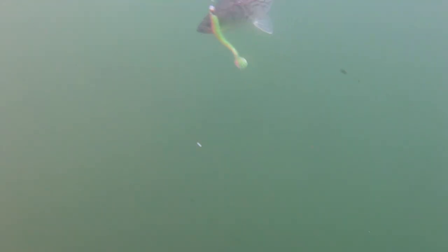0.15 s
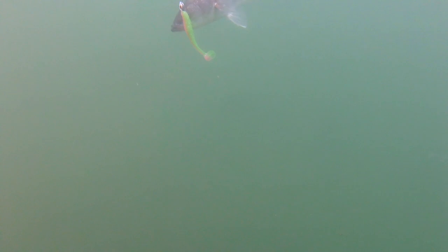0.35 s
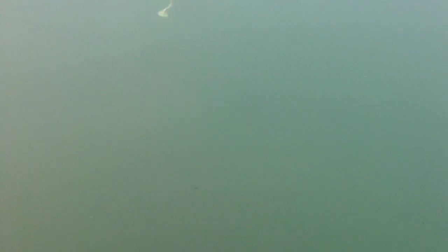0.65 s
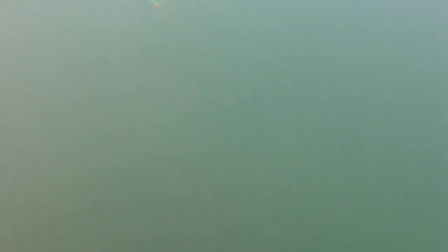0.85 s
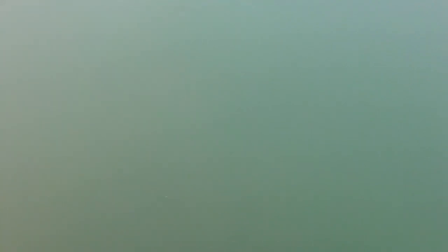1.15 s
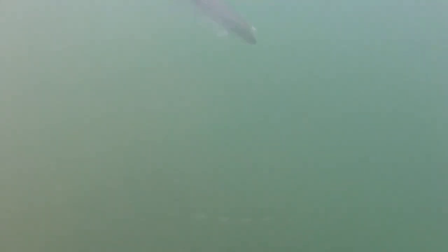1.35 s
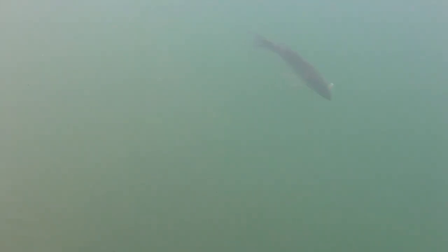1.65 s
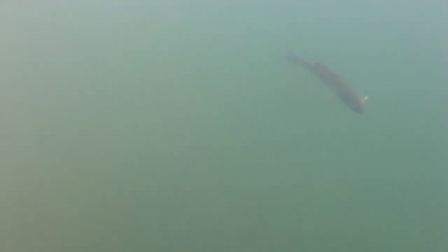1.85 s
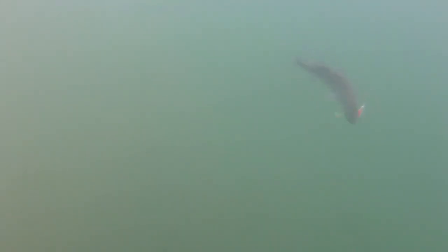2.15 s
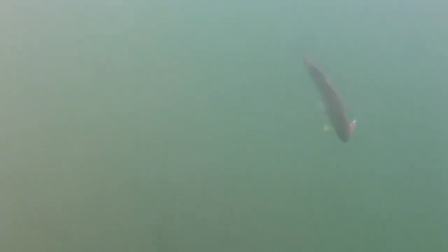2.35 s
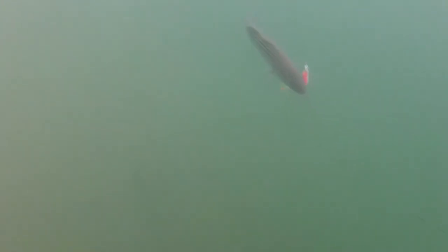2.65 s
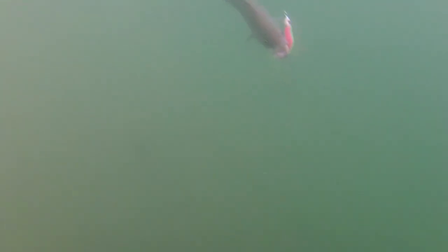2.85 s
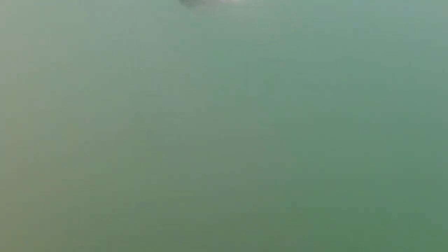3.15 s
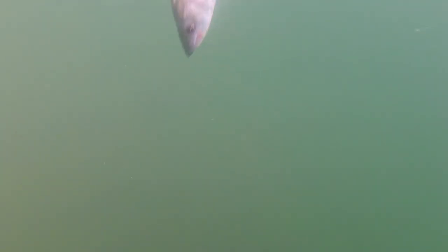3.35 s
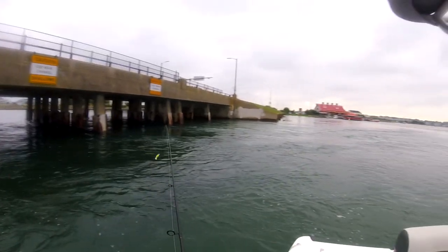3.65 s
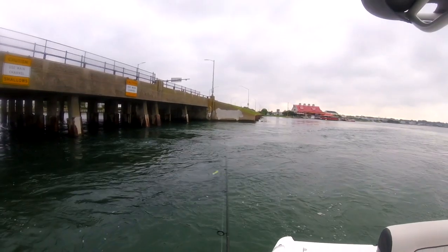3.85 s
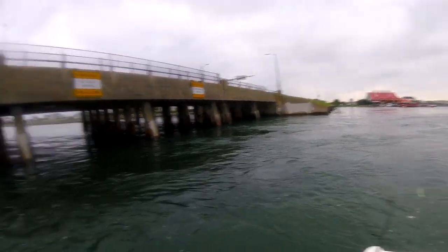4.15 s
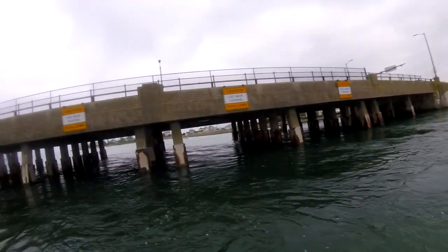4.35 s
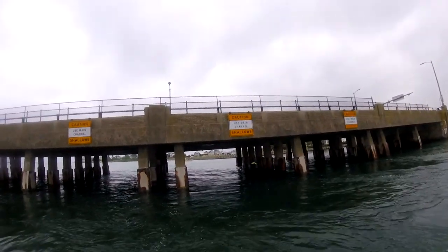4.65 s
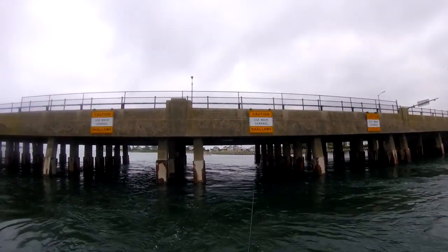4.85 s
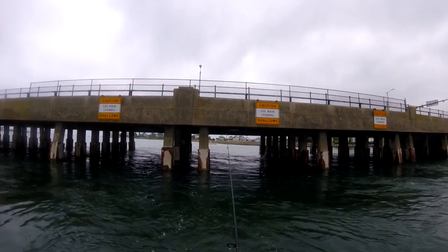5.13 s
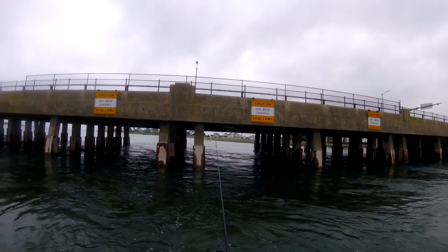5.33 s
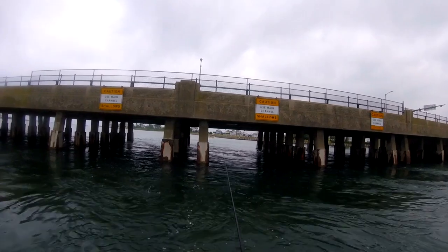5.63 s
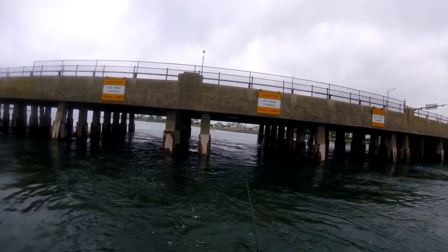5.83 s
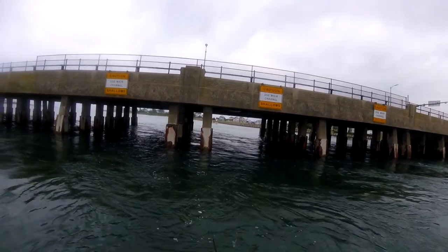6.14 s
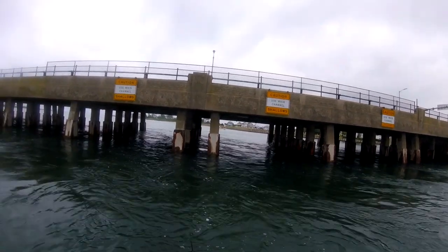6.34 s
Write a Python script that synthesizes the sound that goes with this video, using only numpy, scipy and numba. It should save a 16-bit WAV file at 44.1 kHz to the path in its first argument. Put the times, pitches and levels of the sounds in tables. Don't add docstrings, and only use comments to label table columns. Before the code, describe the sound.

From 0 to 2.55 seconds a sealed microphone underwater hears an idling outboard motor: a steady, fast low throb of about 43 pulses per second, hunting slightly, with a rough hollow hull ring and loose metallic clatter. Bright knocking grows strongest around 1.7 seconds, while low water rumble buffets the housing, heavier after 0.85. Tiny pings tick near 2.1 and 2.4. At 2.55 a thump cuts to a calmer, softer motor passage, with low watery pushes around 2.6 and 3.05 and a brighter ping near 3.2. At 3.48 the sound switches quickly to open air: gusty wind rumbles on the microphone, strongest until about 4.0 and again near 5.6. Water laps hollowly, fine spray hisses, and small splashes slap around 3.6, 4.25, 4.65, 5.4 and 5.8. Distant machinery hums faintly underneath until the wind drops just before the end, near 6.5. A faint gritty, very high buzz colours everything.

```python
import sys
import numpy as np
from scipy import signal
from scipy.fft import rfft, irfft
from scipy.io import wavfile
from scipy.ndimage import uniform_filter1d
from numba import njit

SR = 44100
rng = np.random.default_rng(int(sys.argv[2]) if len(sys.argv) > 2 else 0)


def makeup_ratio(level_db):
    decades = np.asarray(level_db, float) / 20
    return 10 ** decades


def int16_out(signal):
    q = np.round(np.clip(np.atleast_2d(signal).T, -1, 1) * 32767)
    wavfile.write(sys.argv[1], SR, q.astype(np.int16))


N = 286209
T = np.arange(N) / SR
CUT_S, SURFACE_S = 2.554, 3.484
# time_s, level_db
FLOW = [
    [(0.0, -20), (0.2, -23.5), (0.51, -18), (0.68, -23.5), (0.85, -15), (1.02, -18), (1.7, -20),
     (1.9, -16.5), (2.554, -15.5)],
    [(2.554, -25.5), (2.75, -26), (3.02, -21.5), (3.18, -23.5), (3.484, -24)],
]


def unit(x):
    return x / np.sqrt(np.mean(x ** 2))


def curves(*tables):
    s, *columns = np.transpose(np.vstack(tables))
    return [np.interp(T, s, column) for column in columns]


def fade(start, end, slope):
    return np.clip(np.minimum(T - start, end - T) / slope, 0, 1)


def walk(rate):
    hold = int(SR / rate)
    levels = np.repeat(rng.standard_normal(N // hold + 1), hold)
    return 0.6 * uniform_filter1d(uniform_filter1d(levels, hold), hold)[:N]


def tone(hz, wander_hz):
    phase = 2 * np.pi * np.cumsum(hz + wander_hz * walk(14)) / SR
    return np.sqrt(2) * makeup_ratio(6 * walk(9)) * np.sin(phase)


@njit
def svf(x, hz, width):
    y, b, l = np.empty(len(x)), 0., 0.
    g, k = np.tan(np.pi * hz / SR), width / hz
    for i in range(len(x)):
        v = (b + g * (x[i] - l)) / (1 + g * (g + k))
        b, l, y[i] = 2 * v - b, l + 2 * g * v, k * v
    return y


def ring(x, modes, steep=False):
    out = 0
    for k, (hz, width, db) in enumerate(modes):
        band = svf(x, 1. * hz, 1. * width)
        if steep:
            band = svf(band, 1. * hz, 2. * width)
        out = out + (-1) ** k * makeup_ratio(db) * unit(band)
    return unit(out)


def coloured(points, flicker_db, rate):
    hz = np.maximum(np.arange(N // 2 + 1) * SR / N, 1)
    at, db = np.transpose(points)
    spectrum = rfft(rng.standard_normal(N)) * makeup_ratio(np.interp(np.log(hz), np.log(at), db))
    octave = np.log2(hz / 20)
    out = 0
    for k in range(-1, 11):
        band = irfft(spectrum * np.clip(1 - abs(octave - k), 0, 1), N)
        out = out + band * makeup_ratio(flicker_db * walk(rate))
    return unit(out)


def motor():
    # time_s, lead_turns (ahead of a steady idle), load_db
    idle = [
        [(0.0, -0.11, -29.5), (0.2, -0.29, -29.5), (0.36, -0.25, -26.5), (0.72, 0.07, -24), (0.88, 0.2, -24),
         (1.02, 0.073, -25), (1.22, 0.38, -23.5), (1.36, 0.55, -26), (1.53, 0.53, -29), (1.87, 0.78, -31),
         (2.04, 0.56, -29.5), (2.3, 0.58, -25), (2.554, 0.509, -27.5)],
        [(2.554, 0.35, -29), (2.72, 0.49, -33), (3.02, 0.32, -30), (3.2, 0.073, -30.5), (3.484, -0.098, -29.5)],
    ]
    lead, load_db = curves(*idle)
    turns = 43 * T + lead + .17
    fired = np.flatnonzero(np.diff(np.floor(turns)) > 0)
    return hum(turns, load_db) + hull(fired, load_db) + clatter(fired, load_db) + knock(fired)


def hum(turns, load_db):
    orders_db = (-8.5, -8, 0)
    out = 0
    for order, db in enumerate(orders_db, start=1):
        level_db = load_db + db + sway_db(order) - 0.5 + 0.89 * walk(15)
        out = out + np.sqrt(2) * makeup_ratio(level_db) * np.sin(2 * np.pi * order * turns + .1)
    heave_db = curves(*FLOW)[0] - 8.0
    return out + makeup_ratio(heave_db) * np.sin(np.pi * turns)


def sway_db(order):
    # time_s, order, gain_db, length_s
    swings = [(0.0, 1, 16.5, 0.097), (0.535, 1, 13, 0.2), (0.853, 1, 4, .2), (1.302, 1, 15, .35),
              (1.751, 1, 16.5, .3), (2.2, 1, 7, .2), (2.582, 1, 13.5, 0.5), (0.17, 2, 14, 0.18),
              (0.653, 2, 10, 0.28), (1.218, 2, 6.5, .25), (1.952, 2, 12.5, 0.26), (2.42, 2, 8, 0.18),
              (2.8, 2, 8.5, 0.29), (3.329, 2, 10, 0.18), (1.999, 3, 6, 0.17), (2.552, 3, 6.5, .2)]
    return sum(db * np.exp(-2 * ((T - s) / length) ** 2) for s, k, db, length in swings if round(k) == order)


def blows(fired, scatter_db, scatter_s, rattle_s, rattle, floor):
    uneven_db = 2.0 * (-1) ** np.arange(len(fired))
    chance = np.clip(rng.standard_normal((N // 500, 2))[:len(fired)], -2, 2)
    at = np.clip(fired + (chance[:, 1] * scatter_s * SR).astype(int), 0, N - 1)
    tap = np.zeros(N)
    tap[at] = makeup_ratio(uneven_db + scatter_db * chance[:, 0])
    puff = signal.lfilter([1], [1, -np.exp(-1 / (rattle_s * SR))], tap) * rng.standard_normal(N)
    return unit(tap) + rattle * unit(puff) + floor * rng.standard_normal(N)


def hull(fired, load_db):
    # pitch_hz, width_hz, level_db
    hull_modes = [(176, 80, -12.5), (212.8, 9.9, -8), (271.5, 42, -1.5), (344.8, 56, 1.5), (422.6, 42, 0),
                  (489, 55, -2), (534.3, 71, 0)]
    # pitch_hz, wander_hz, level_db
    gear_tones = [(172, 6, -17), (215, 5, -14), (268, 9, -12), (346, 12, -10), (425, 9, -11),
                  (540, 16, -17)]
    blow = blows(fired, scatter_db=1.5, scatter_s=.0003, rattle_s=.014, rattle=1.2, floor=1.3)
    gears = sum(makeup_ratio(db) * tone(hz, wander) for hz, wander, db in gear_tones)
    return makeup_ratio(load_db) * (0.99 * ring(blow, hull_modes, steep=True) + gears)


def clatter(fired, load_db):
    # pitch_hz, width_hz, level_db
    leg_modes = [(700, 273, 0.5), (932.4, 75, 0.5), (1228, 84, -7), (1400, 330, -9.5), (1694, 44, -17)]
    dive_db = (-18, -21.5)
    level_db = load_db + np.where(T < CUT_S, dive_db[0] - 1 * T, dive_db[1])
    out = 0
    for mode in leg_modes:
        blow = blows(fired, scatter_db=2.5, scatter_s=.0012, rattle_s=.006, rattle=1.2, floor=.55)
        out = out + makeup_ratio(mode[2]) * ring(blow, [mode], steep=True)
    return makeup_ratio(level_db) * unit(out)


def knock(fired):
    # pitch_hz, width_hz, level_db
    knock_modes = [(2370, 110, 0), (2680, 120, -6.5), (3050, 450, -9), (3650, 250, -13), (2190, 120, -9)]
    # time_s, knock_db
    facing = [
        [(0.0, -68), (0.17, -71), (0.68, -70), (0.85, -65), (1.3, -59.5), (1.75, -57), (1.9, -62), (2.2, -60.5),
         (2.554, -65)],
        [(2.554, -70), (2.72, -79.5), (3.05, -71.5), (3.484, -62.5)],
    ]
    beam = (1, .6, 0.53, .3, 0.98)
    side_on_db = -64
    knock_db, = curves(*facing)
    out = 0
    for share, mode in zip(beam, knock_modes):
        blow = blows(fired, scatter_db=2.6, scatter_s=.001, rattle_s=.006, rattle=1.2, floor=.28)
        part = makeup_ratio(mode[2]) * ring(blow, [mode], steep=True)
        out = out + makeup_ratio(side_on_db + share * (knock_db - side_on_db)) * part
    return makeup_ratio(-2.0) * out


def water():
    # pitch_hz, level_db (per Hz)
    buffet = [(12, -35.5), (22, -7), (50, -1), (100, -10), (150, -7.5), (200, -17.5), (600, -28),
              (1500, -54), (3000, -79)]
    rumble = makeup_ratio(curves(*FLOW)[0] - 4.5) * coloured(buffet, flicker_db=0.5, rate=9)
    return rumble + surges() + bubbles()


def surges():
    # start_s, peak_db, pitch_hz, length_s
    pushes = [
        (1.936, -10, 67.4, 0.049),
        (2.3, -18, 24.2, 0.49),
        (2.446, -10.5, 54.6, 0.083),
        (2.45, -23.5, 190, 0.12),
        (2.596, -7.5, 129, 0.027),
        (2.618, -8.5, 130.8, 0.052),
        (2.62, -22, 182, .07),
        (3.03, -15.5, 158.6, 0.03),
        (3.049, -25, 266, 0.086),
        (3.095, -12.5, 168, 0.032),
    ]
    out = 0
    for s, db, hz, length in pushes:
        age = np.clip((T - s) / length, 0, 1)
        out = out + makeup_ratio(db) * np.sin(np.pi * age) * np.sin(2 * np.pi * hz * (T - s))
    return out


def bubbles():
    # start_s, peak_db, pitch_hz
    pings = [
        (2.105, -46, 1720),
        (2.3927, -40, 1550),
        (3.1635, -43, 1480),
        (3.182, -35, 1810),
    ]
    out = 0
    for s, db, hz in pings:
        age = np.maximum(T - s, 0)
        housing = 0.24 * np.sin(2 * np.pi * 6600 * age)
        out = out + makeup_ratio(db) * np.exp(-age / 0.0017) * (np.sin(2 * np.pi * hz * age) + housing)
    return out


def microphone_hiss():
    # pitch_hz, level_db (per Hz)
    hiss_points = [(1500, -11.5), (3000, -3), (5500, -25.5), (6200, -5), (6500, 5.5), (6900, -2.5),
                   (9500, -10), (10300, -18), (16000, -25)]
    hiss_db = (-70, -78.5)
    return makeup_ratio(np.where(T < CUT_S, *hiss_db)) * coloured(hiss_points, flicker_db=2.0, rate=17)


def open_air():
    return wind() + splashes() + lapping() + spray() + drones() + haze()


def wind():
    # pitch_hz, level_db (per Hz)
    wind_points = [(12, -30), (22, -2.5), (45, -1), (75, -1), (108, -4), (141, -2), (189, -13), (240, -13),
                   (310, -34), (530, -88)]
    return makeup_ratio(gusts() + 3.0) * coloured(wind_points, flicker_db=0.5, rate=11)


def gusts():
    # peak_s, peak_db, fall_db_per_s
    gust_table = [(3.55, -27.5, 42), (3.62, -25.5, 200), (3.69, -24.5, 129), (3.85, -25, 300),
                  (3.99, -23.5, 130), (4.27, -34, 55), (4.61, -29, 63), (4.74, -28.5, 140),
                  (4.89, -28.5, 298), (5.17, -29.5, 55), (5.31, -27.5, 300), (5.53, -30, 160),
                  (5.61, -24, 200), (5.74, -30, 17), (6.36, -29, 23)]
    drop_s, drop_length_s = (6.46, 0.027)
    s, db, fall = np.transpose(gust_table)[:, :, None]
    peaks = db - np.where(T < s, 144 * (s - T), fall * (T - s))
    lull_db = -34
    return np.maximum(peaks.max(axis=0), lull_db) - 11 * np.clip((T - drop_s) / drop_length_s, 0, 1)


def splashes():
    # start_s, peak_db, centre_hz, width_hz, decay_s
    drops = [(3.623, -32.5, 5300, 1500, 0.0039), (3.623, -45, 10000, 4000, .002),
             (3.636, -40, 6400, 5000, .003), (3.647, -45, 7500, 2000, .002), (3.976, -47, 6000, 3000, .004),
             (4.249, -41, 2700, 300, .005), (4.63, -50, 5000, 5000, .03), (4.648, -47, 4500, 5000, 0.068),
             (4.664, -39.5, 2970, 2500, 0.023), (4.664, -50, 6500, 5000, 0.01),
             (4.98, -43.5, 6500, 2000, .004), (5.348, -39.5, 2500, 3000, 0.0037),
             (5.455, -33, 1000, 600, .013), (5.775, -34, 6460, 1500, 0.0048),
             (5.776, -51, 9000, 8000, .003), (5.786, -37, 5440, 3000, 0.0041),
             (5.797, -36.5, 2300, 1200, 0.0064), (5.803, -45.5, 6000, 4000, 0.013),
             (5.828, -43, 2200, 500, .004), (6.28, -48, 4000, 2000, 0.0097), (5.417, -45, 2500, 1800, .004),
             (5.469, -47, 3700, 1500, .004)]
    out = 0
    for s, db, hz, width, decay in drops:
        burst = ring(rng.standard_normal(N), [(hz, width, 0)], steep=True)
        age = np.maximum(T - s, 0)
        slap = 2.3 * np.exp(-2 * width * age) * np.sin(2 * np.pi * hz * age)
        out = out + makeup_ratio(db - 7.5) * (T >= s) * (np.exp(-age / decay) * burst + slap)
    return out


def lapping():
    # pitch_hz, level_db (per Hz)
    lap_points = [(170, -35), (290, -1.5), (313, 3.5), (335, -3.5), (394, -4.5), (671, -16), (816, -12),
                  (967, -15), (2200, -29), (2860, -39), (4840, -120)]
    return makeup_ratio(-49 + 9.0) * coloured(lap_points, flicker_db=0.5, rate=16)


def spray():
    # pitch_hz, level_db (per Hz)
    spray_points = [(1060, 1), (1800, -8), (1950, -17), (2730, -1.5), (5390, -12.5), (6580, -4),
                    (7540, -11.5), (9450, -15), (10300, -26), (11200, -18), (13700, -28), (15100, -36),
                    (15700, -36.5)]
    # time_s, level_db
    spray_level = [(3.48, -59), (4.0, -58.5), (4.5, -57.5), (4.9, -55.5), (5.4, -57.5), (5.9, -57.5),
                   (6.49, -58.5)]
    spray_db, = curves(spray_level)
    hits = makeup_ratio(4.0 * rng.exponential(size=N)) * (rng.random(N) < .002)
    droplets = 1 + .25 * svf(hits, 120., 300.)
    return makeup_ratio(spray_db + 1.0) * droplets * coloured(spray_points, flicker_db=3.45, rate=16)


def drones():
    # start_s, end_s, fade_s, pitch_hz, wander_hz, level_db
    machines = [
        (3.65, 5.42, .1, 264, 7, -42.5),
        (3.4, 6.6, .1, 86, 2, -36),
        (3.4, 4.4, .3, 860, 14, -55),
        (5.83, 6.22, .08, 803, 2, -55),
        (5.46, 5.9, .08, 266, 6, -43),
        (5.85, 6.6, .1, 264, 9, -48),
        (4.3, 5.8, .2, 820, 14, -58),
    ]
    return sum(makeup_ratio(db) * fade(start, end, slope) * tone(hz, wander)
               for start, end, slope, hz, wander, db in machines)


def haze():
    # start_s, end_s, fade_s, pitch_hz, width_hz, level_db
    start, end, slope, hz, width, db = (4.4, 5.9, .5, 11400, 2000, -76)
    fizz = ring(rng.standard_normal(N), [(hz, width, 0)], steep=True)
    return makeup_ratio(db) * fade(start, end, slope) * fizz


def scene():
    up = np.clip((T - SURFACE_S) / 0.0075, 0, 1)
    dive = motor() + water() + microphone_hiss()
    return ((1 - up) * dive + up * open_air())[None]


def add_jumps(dry):
    # time_s, size_db, run_up_s
    breaks = [
        (2.1052, -30, .002),
        (2.3935, -35, .002),
        (2.554, -13, .004),
        (2.618, -33, .002),
    ]
    jumps = sum(makeup_ratio(db) * (T < s) * np.exp(np.minimum(T - s, 0) / run_up) for s, db, run_up in breaks)
    return dry + uniform_filter1d(jumps, size=3)


def timing_error():
    rounding = [(0, -2.6), (.055, -.8), (.125, -2.4), (.265, -.85), (.555, -2.65)]
    share, phase = np.transpose(rounding)
    frame = T * 59.94 % 1
    stair = np.searchsorted(share, frame, side="right") - 1
    stairs = .17 * (stair - 3) + .2 * (frame - .5)
    slip = stairs + 1.2 * np.diff(stairs, prepend=stairs[0])
    wobble = .5 * np.cos(2 * np.pi * 16004 * T + phase[stair])
    return slip + wobble


def top_cut(x):
    return signal.sosfilt(signal.butter(12, 17130, fs=SR, output="sos"), x)


def record(dry):
    out = add_jumps(dry) + np.gradient(dry, axis=1) * timing_error()
    low_pass = signal.ellip(10, .2, 70, 15760, fs=SR, output="sos")
    out = signal.sosfilt(low_pass, out)
    return top_cut(out)


dry = scene()
out = record(dry)
int16_out(out)
```